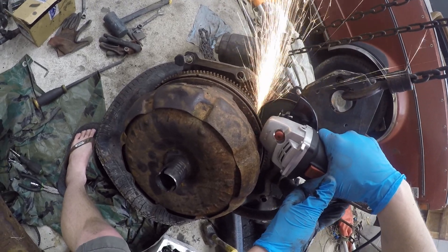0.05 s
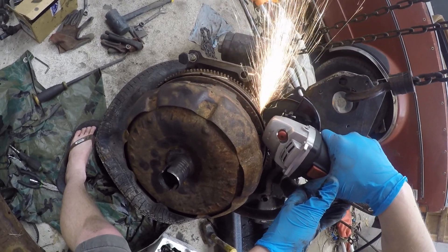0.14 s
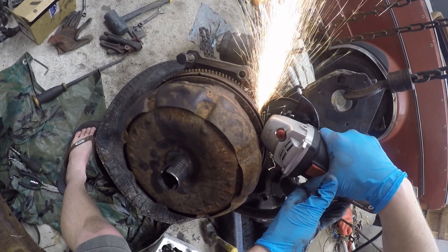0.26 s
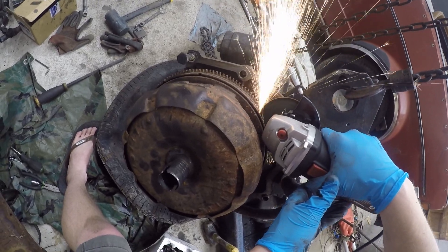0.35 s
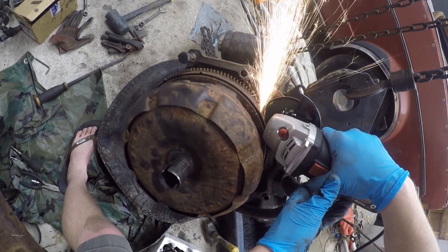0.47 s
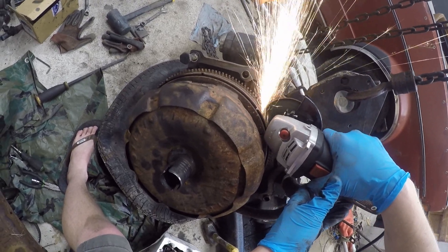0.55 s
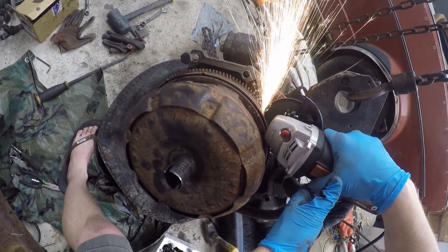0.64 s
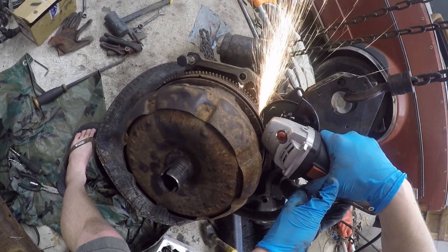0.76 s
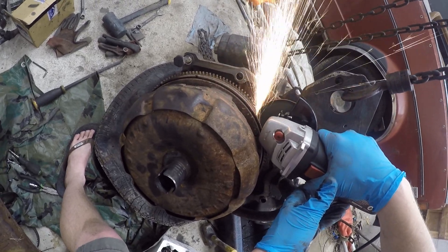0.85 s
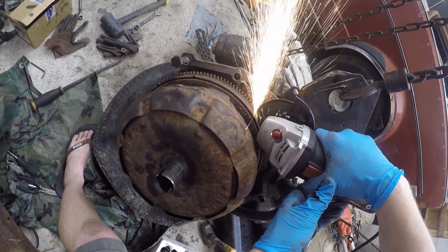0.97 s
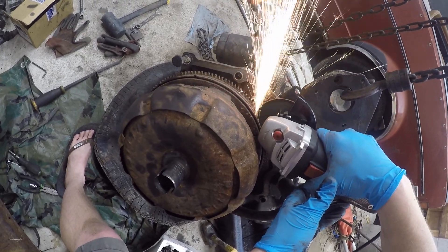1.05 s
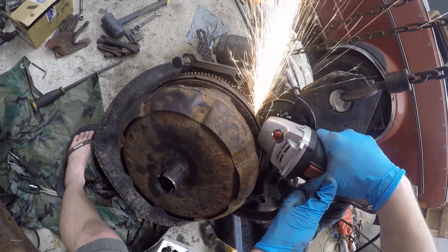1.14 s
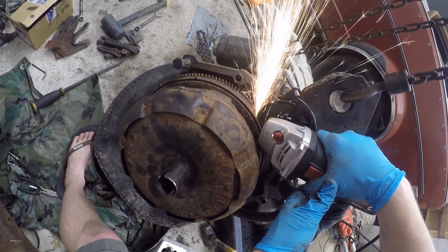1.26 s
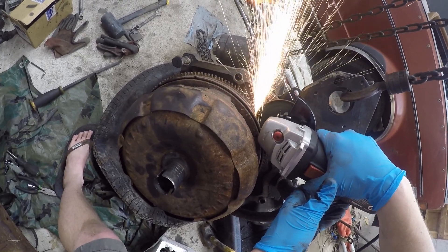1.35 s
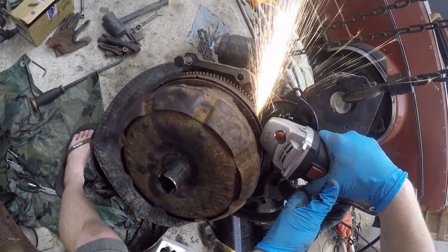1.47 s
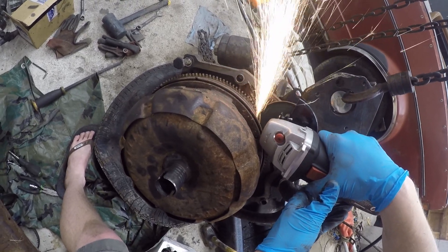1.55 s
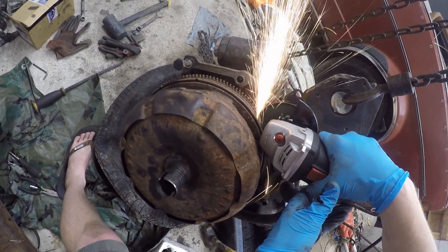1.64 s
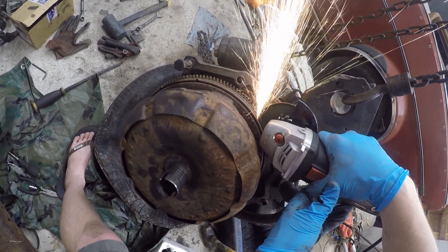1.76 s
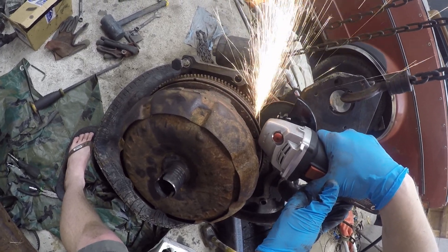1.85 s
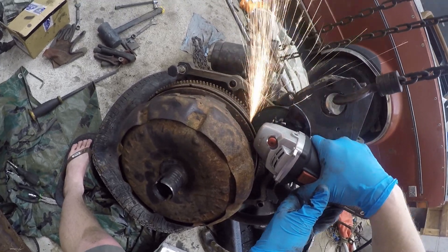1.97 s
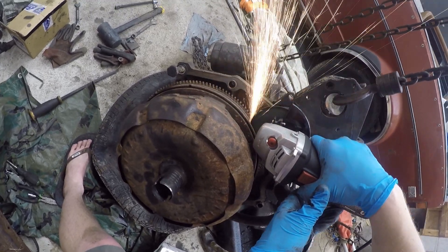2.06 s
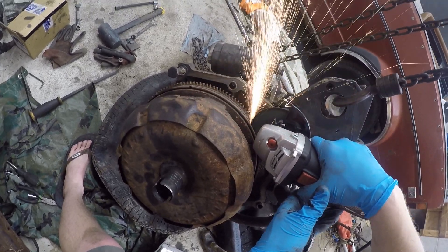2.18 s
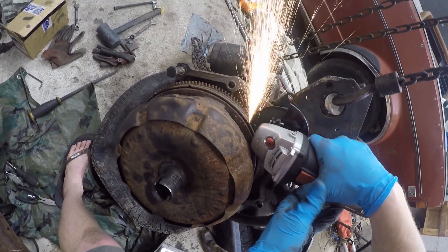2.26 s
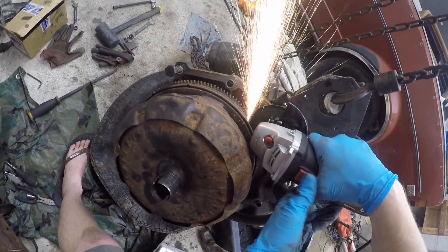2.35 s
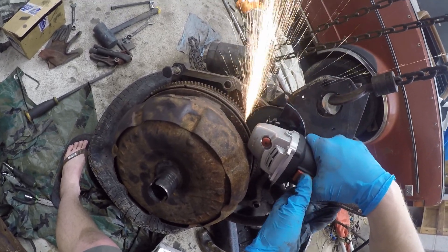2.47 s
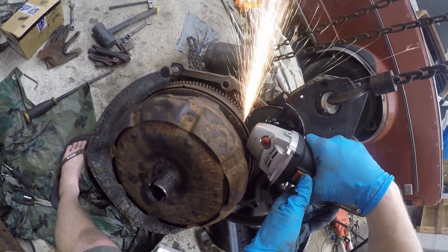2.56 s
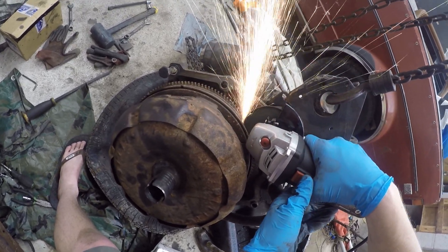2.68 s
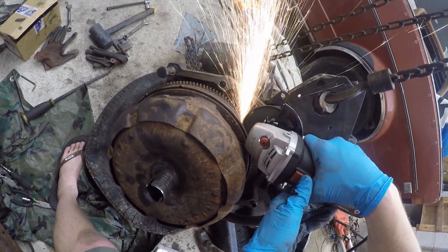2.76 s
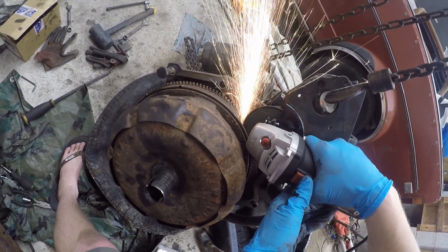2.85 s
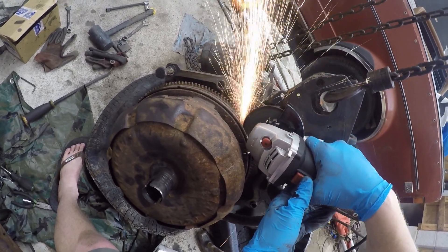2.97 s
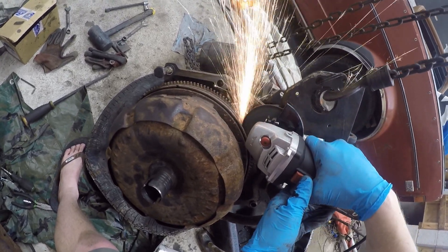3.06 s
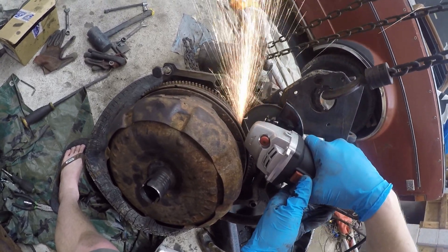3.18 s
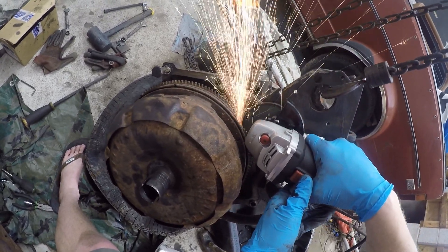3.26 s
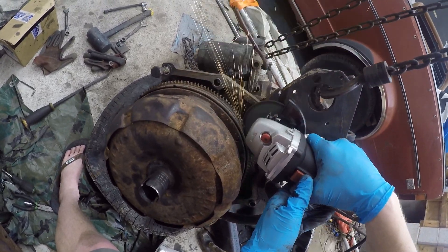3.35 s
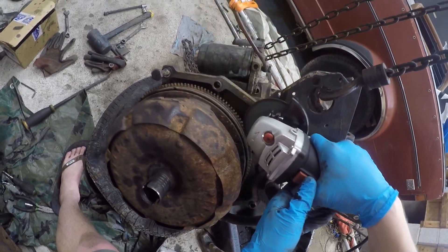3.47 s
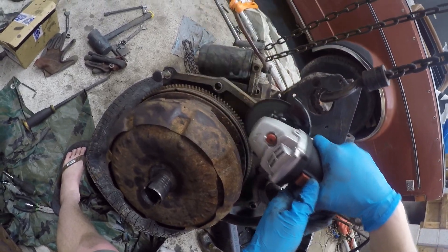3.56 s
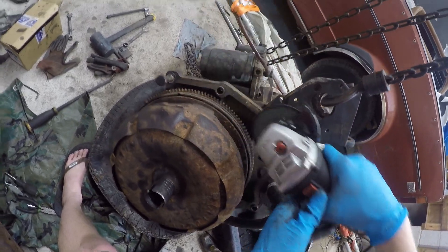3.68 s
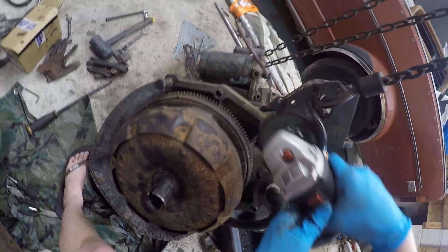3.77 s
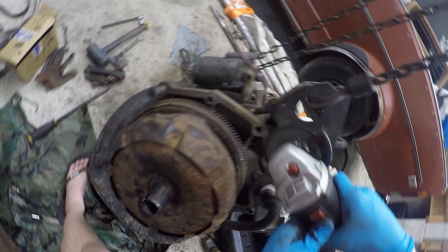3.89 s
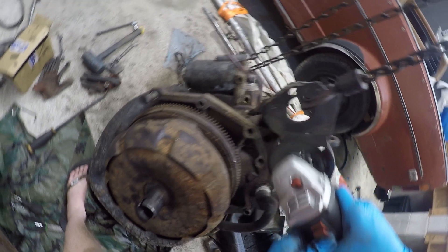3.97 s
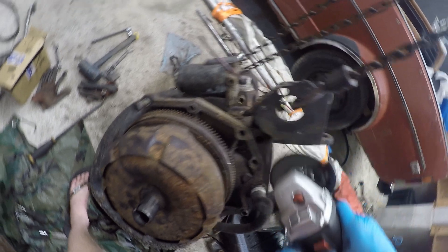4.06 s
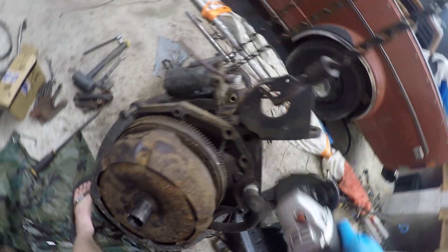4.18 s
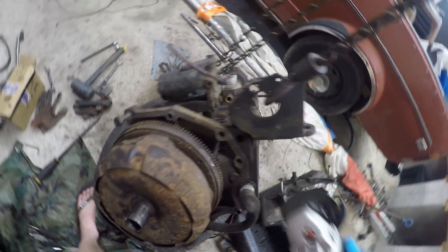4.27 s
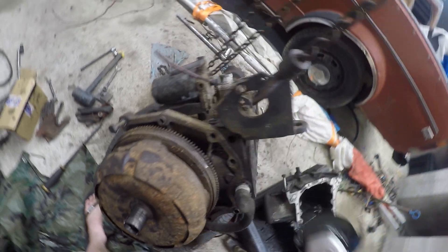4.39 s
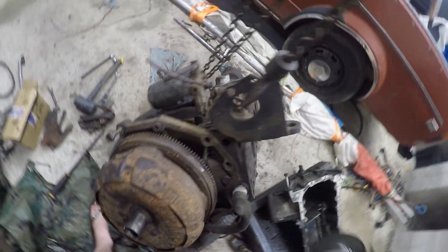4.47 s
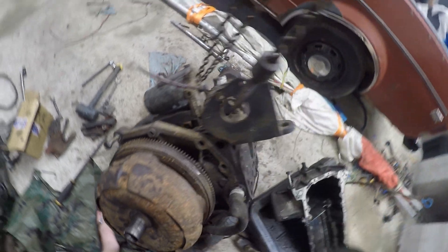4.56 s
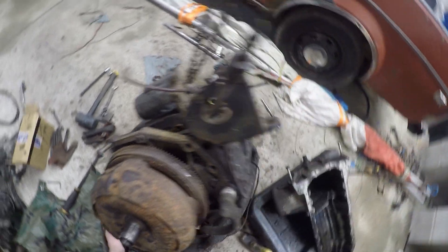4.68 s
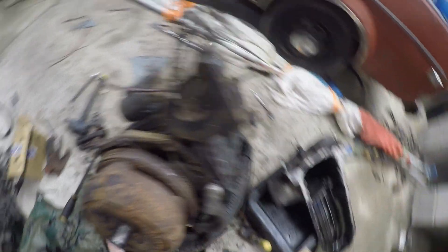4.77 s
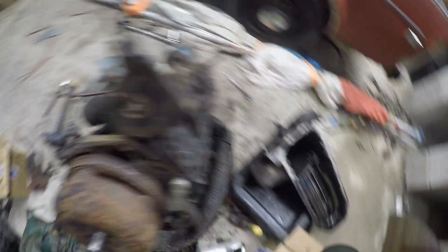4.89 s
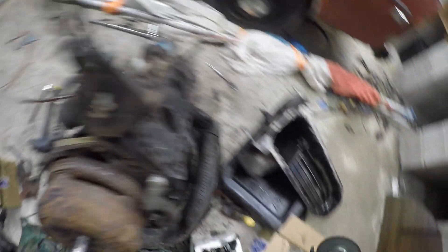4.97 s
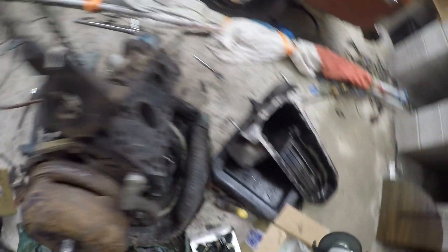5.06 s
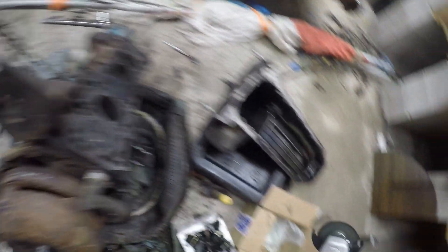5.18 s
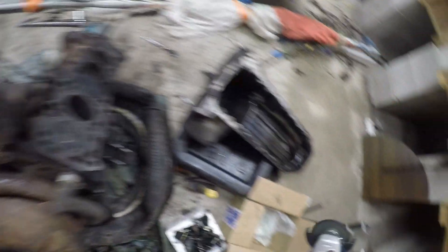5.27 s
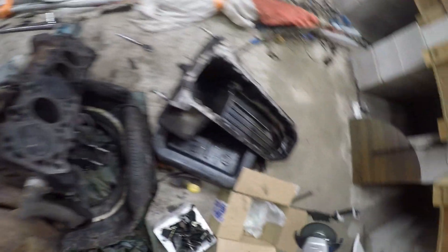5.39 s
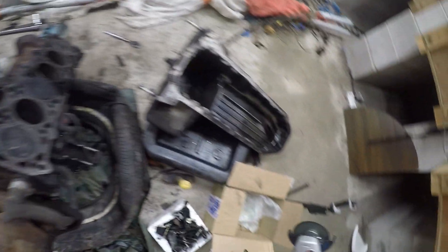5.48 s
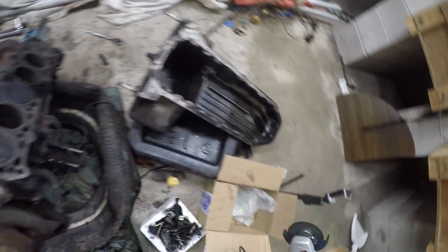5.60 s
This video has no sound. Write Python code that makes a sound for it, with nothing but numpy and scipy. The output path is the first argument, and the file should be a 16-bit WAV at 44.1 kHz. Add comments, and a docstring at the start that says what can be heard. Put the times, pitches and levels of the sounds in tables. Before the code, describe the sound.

Close by in a garage, an angle grinder labours through steel, rasping and ringing with an unsteady pitch. It speeds up into a sharper, squealing grind, then the cutting stops a little past halfway. The motor spins freely with a softer hissing whine and begins to coast down, with a few faint metal clicks. Light air and handling rumble touches the microphone underneath.

```python
"""Angle grinder cutting a bolt

An angle grinder cuts a steel bolt on an engine in a garage, heard in mono at arm's length.
The motor labours in the cut, picks up, is lifted clear, races and is switched off to coast down.
Grit and gear teeth force the steel into resonance, the disc's lobed rim chatters and squeals,
fan and brushes hiss and the unbalanced rotor hums, all following one shaft speed.
Air and handling rumble underneath, and a short metallic rattle comes near the end."""
import sys
import numpy as np
from scipy import signal
from scipy.fft import rfft, irfft, next_fast_len
from scipy.io import wavfile
from scipy.ndimage import uniform_filter1d

SR = 44100
rng = np.random.default_rng(int(sys.argv[2]) if len(sys.argv) > 2 else 0)


def wav_record(signal):
    """Record a signal, one row per channel, as 16-bit PCM in the file named by sys.argv[1]."""
    frames = np.transpose(np.atleast_2d(signal))
    bounded = np.clip(frames, -1, 1)
    # unit amplitude maps onto the largest positive 16-bit level
    quanta = np.round(bounded * 32767).astype(np.int16)
    wavfile.write(sys.argv[1], SR, quanta)


N = 248283
TIME = np.arange(N) / SR
FFT_SIZE = next_fast_len(N, real=True)
FREQ = np.maximum(np.arange(FFT_SIZE // 2 + 1) * SR / FFT_SIZE, 1)

# Motor speed under the hand's pressure. Each row: time in seconds, turns per second.
LOADED_SPEED = [(0, 232), (.1, 246), (.21, 348), (.45, 283), (.63, 254), (.78, 294), (.89, 269), (.97, 283),
                (1.05, 245), (1.17, 214), (1.35, 289), (1.52, 293), (1.72, 249), (1.96, 236), (2.03, 400),
                (2.32, 421.5), (2.39, 413), (2.55, 409), (2.73, 400.5), (2.91, 398), (3.3, 426.5)]
# Strength of the scraping. Each row: time in seconds, level in dB, treble share in dB.
CUT_LEVELS = [(0, -29.5, -13.5), (.75, -30.5, -10.5), (1.35, -29, -13.5), (2.0, -29.5, -13.5),
              (2.35, -28, -10), (2.8, -27.5, -12.5), (3.3, -27, -10)]
# Firmness of contact; the disc skims the bolt again on leaving. Each row: time in seconds, gain in dB.
DISC_CONTACT = [(0, 0), (3.315, -0.5), (3.34, -20), (3.36, -13), (3.385, -4), (3.41, -23), (3.45, -63)]
# Scraping that repeats with each turn of the disc. Each row: time in seconds, share in dB.
REPEATING_SHARE = [(0, -9), (1.95, -8), (2.1, -4.5), (2.4, -3), (2.7, -4), (3, -0.5), (3.3, -4)]
# The disc frees itself and bites cleanly. Each row: time in seconds, share of the fast colour, 0 to 1.
CLEAN_BITE = [(1.94, 0.2), (2.03, 0.27), (2.35, 0.58), (2.8, 0.83), (3.2, 0.9)]
# Broad colour of the cut. Each row: frequency in Hz, gain in dB when labouring, and when fast.
STEEL_COLOUR = [(150, -28, -34.5), (440, -24.5, -33), (780, -16, -11.5), (1580, -19.5, -8.5),
                (1830, -4, -9.5), (3570, -4, 4.5), (4350, -14.5, -7), (5570, -4, -4.5),
                (9040, -18.5, -17.5), (10900, -20.5, -16.5), (14900, -28.5, -8)]
# Modes of disc, guard and bolt. Each row: centre and width in Hz, lift in dB labouring, and fast.
STEEL_RESONANCES = [(902, 98, 20, 10.5), (1175, 118, 19.5, 9.5), (1618, 53, 8.5, 10.5),
                    (1806, 180, -1, 8.5), (2020, 244, 4.5, 14.5), (2250, 470, -0.8, 7.5),
                    (2448, 114, 7.5, -1), (2760, 130, 3, 6), (2937, 346, 12.5, 4.5), (3160, 130, 5.5, -7.5),
                    (3413, 125, 8.5, 2.5), (3769, 374, 16, 14), (4080, 600, 9, 4.5), (4513, 230, 8, 17.5),
                    (4846, 106, 9, 7), (5026, 386, 7.5, 19), (5313, 207, 2.5, 15), (5967, 400, 3.5, 13.5),
                    (6670, 130, 8.5, -1), (6640, 270, -7.5, 8), (7705, 760, 4.5, 17), (8130, 440, 1.5, 6.5),
                    (9400, 890, -4, 14.5), (10270, 330, -0.5, 14.5), (11750, 2500, -1, 13)]
# Lobes of the rim. Each row: bumps per turn of the disc, relative level in dB.
RIM_LOBES = [(7, -6), (13, -12), (14, -6), (15, -1), (16, -4), (17, -3), (18, -4), (19, -5), (21, -6),
             (35, -3), (37, -1), (38, 0), (41, -2)]
# Broad colour of the motor. Each row: frequency in Hz, gain in dB when near, and when far.
HOUSING_COLOUR = [(150, -25.5, -19), (514, -16.5, -20), (730, -11.5, -5), (1420, -3.5, -2.5),
                  (2280, -9.5, -6.5), (3750, 1.5, -2), (6060, -15, -9.5), (8680, -33, -22.5),
                  (12150, -19.5, -20), (15000, -18, -21)]
# Modes of housing and guard. Each row: centre and width in Hz, lift in dB when near, and when far.
HOUSING_RESONANCES = [(927, 300, 6, -4), (1130, 400, 10.5, 8.5), (1850, 240, 3, 5), (2025, 196, 9, 4),
                      (2460, 270, 8.5, 6), (2924, 380, 12, 7), (3456, 150, 9, 5.5), (3765, 250, 10, 5.5),
                      (4280, 340, 0.0, 8), (4700, 230, 10.5, 1), (5030, 460, 8, 10), (5730, 190, 5, 7.5),
                      (6056, 260, 11.5, 8), (6660, 400, 8.5, -3), (7150, 450, 5.5, 0.5),
                      (8140, 1140, 20.5, 10), (9540, 1300, 13.5, -1.5), (10670, 750, 4, 12),
                      (11450, 320, 9.5, 8), (13900, 1800, 1, -2)]
# The vents turn as the grinder is lifted. Each row: time in seconds, gain in dB, treble share in dB.
VENT_FACING = [(3.45, 3.5, -10.5), (3.85, 0.3, -7.5), (4.17, -0.1, -5), (4.42, -1.8, -6.5), (4.7, -1, -7.5),
               (5.63, -1.4, -9)]
# The grinder swings down and away. Each row: time in seconds, share of the far colour, 0 to 1.
SWING_AWAY = [(4.2, 0.2), (4.42, 0.93)]
# Overtones from disc shaft and rotor. Each row: multiple of the motor speed, relative level in dB.
HUM_OVERTONES = [(1.62, -1), (2, 1)]
# Low rumble, stronger while the motor labours. Each row: time in seconds, level in dB.
RUMBLE_LEVELS = [(0, -57.5), (1.85, -56.5), (2.1, -60.5), (5.63, -58)]
# Buffets of air and handling. Each row: time of the peak in seconds, level in dB.
AIR_BUFFETS = [(.05, -43), (.35, -47.5), (.53, -54), (1.08, -54), (1.63, -49.5), (2.51, -53), (3.48, -53.5),
               (4.08, -52), (4.94, -51), (5.26, -51)]
# Small metal knocks. Each row: start in seconds, level in dB, decay time in seconds.
METAL_KNOCKS = [(.045, -19, 0.0038), (0.338, -33.5, 0.0037), (1.256, -28, .005), (2.749, -25, 0.00081),
                (3.932, -37, 0.018), (4.016, -41, 0.0022), (4.062, -34.5, 0.021), (5.48, -45, 0.0048),
                (5.495, -47, 0.012)]
# Squeals. Each row: start and length in seconds, bumps per turn, level in dB at full contact.
DISC_SQUEALS = [(2.2, 0.069, 16, -32), (2.68, 0.267, 16, -29.5), (2.66, 0.13, 18, -33), (4, 0.11, 18, -41)]
# Brief dips in the noise. Each row: centre in seconds, depth in dB, half length in seconds.
LEVEL_DIPS = [(3.632, 5, .008), (4.592, 8, .008), (5.122, 8, .009), (5.336, 5, .007), (5.378, 5, .007)]

PINION_TEETH, GEAR_RATIO = 12, 12 / 37  # the ratio is disc turns per motor turn
WORKING_HZ = 400  # reference speed for the levels of chatter, fan and hum
DRAGGING = TIME < CLEAN_BITE[0][0]  # true until the disc frees itself


def undb(db):
    """Amplitude ratio for a level in decibels."""
    return np.exp(np.asarray(db) * (np.log(10) / 20))


def curves(table):
    """Linear interpolation in time of each column after the first."""
    times, *columns = np.transpose(table)
    return [np.interp(TIME, times, column) for column in columns]


def unit(x):
    """Normalisation to an rms of 1."""
    return x / np.sqrt(np.mean(x ** 2))


def steady(x, size=4001):
    """Normalisation by the running rms over size samples."""
    return x / np.sqrt(uniform_filter1d(x ** 2, size) + 1e-18)


def band(x, lo_hz, hi_hz, order=5):
    """Maximally flat band-pass filtering."""
    return signal.sosfilt(signal.butter(order, [lo_hz, hi_hz], "band", fs=SR, output="sos"), x)


def wander(hz, size=8192):
    """Random fluctuation of rms 1: noise low-passed at hz."""
    rates = np.arange(size // 2 + 1) * SR / N
    slow = irfft(rfft(rng.standard_normal(size)) / (1 + (rates / hz) ** 4))
    return np.interp(TIME, np.linspace(0, N / SR, size), unit(slow))


def octaves(hz):
    """Speed on a logarithmic scale, in octaves above the working speed."""
    return np.log2(hz / WORKING_HZ)


def resonance(hz, centre_hz, width_hz, lift_db):
    """Resonance curve: the lift in dB falls to half at half a width from the centre."""
    return lift_db / (1 + (2 * (hz - centre_hz) / width_hz) ** 2)


def radiation(hz, corner_hz):
    """Radiation efficiency: a small body radiates poorly below its corner frequency."""
    return np.minimum(hz / corner_hz, 1) ** 6


def ring(x, colour, modes=(), column=0):
    """Forced response of a body: a broad colour with resonances on it, from the chosen gain column."""
    colour_hz, *gains_db = np.transpose(colour)
    db = np.interp(np.log(FREQ), np.log(colour_hz), gains_db[column])
    for centre_hz, width_hz, *lifts_db in modes:
        db = db + resonance(FREQ, centre_hz, width_hz, lifts_db[column])
    # Folding the cepstrum gives minimum phase, so each mode rings after its cause.
    cepstrum = irfft(np.log(undb(db)), FFT_SIZE)
    cepstrum[1:FFT_SIZE // 2] *= 2
    cepstrum[FFT_SIZE // 2 + 1:] = 0
    return irfft(rfft(x, FFT_SIZE) * np.exp(rfft(cepstrum)), FFT_SIZE)[:N]


def shaft_speed(no_load_hz=552, run_up_s=.68, switch_off_s=4.01, coast_s=2.17):
    """Exponential relaxation: freed of its load the motor runs up; switched off, friction slows it."""
    freed_s, freed_hz = LOADED_SPEED[-1]
    powered_s = np.clip(TIME, freed_s, switch_off_s) - freed_s
    hz = curves(LOADED_SPEED)[0] + (no_load_hz - freed_hz) * (1 - np.exp(-powered_s / run_up_s))
    return hz * np.exp(-np.maximum(TIME - switch_off_s, 0) / coast_s)


def grains(per_second, spread_db):
    """Shot noise: dense, independent impacts of unequal size."""
    hits = rng.random(N) < per_second / SR
    sizes = rng.standard_normal(N) * undb(spread_db * np.minimum(rng.exponential(size=N), 4))
    return unit(hits * sizes)


def rim_roughness(disc_turns, size=2048, count=110):
    """Quasi-periodic excitation: the rim's roughness returns every turn and slowly changes with wear."""
    roughness = 0
    for _ in range(4):
        orders = np.zeros(size // 2 + 1, complex)
        orders[1:count] = np.exp(2j * np.pi * rng.random(count - 1))
        profile = np.interp(disc_turns % 1, np.arange(size) / size, irfft(orders))
        roughness += wander(2.32) * profile
    return steady(roughness)


def gear(turns, rattle_hz, clean):
    """Modulation of the tooth-mesh tone: backlash smears it and the crown wheel sways it once a turn."""
    sway = 0.11 * np.sin(2 * np.pi * GEAR_RATIO * turns)
    mesh = np.exp(1j * (2 * np.pi * PINION_TEETH * turns + sway))
    backlash = wander(rattle_hz) + 1j * wander(rattle_hz)
    return unit(np.real(mesh * (clean + backlash)))


def cutting(hz, turns):
    """Forced vibration: grit and loaded gear teeth drive the modes of the steel."""
    level_db, treble_db = curves(CUT_LEVELS)
    disc_turns = turns * GEAR_RATIO
    grit = grains(per_second=14000, spread_db=-1)
    grit += undb(curves(REPEATING_SHARE)[0]) * rim_roughness(disc_turns)
    pressure_db = 0.46 * np.sin(2 * np.pi * disc_turns) + 0.7 * wander(100)  # harder once a turn
    grit = steady(grit) * undb(pressure_db)
    flare_db = resonance(PINION_TEETH * hz, centre_hz=2920, width_hz=330, lift_db=3.8)
    loaded_whine = undb(-14.5 + flare_db + wander(4.9)) * gear(turns, rattle_hz=133, clean=0.99)
    fast_whine = undb(-20.5) * gear(turns, rattle_hz=190, clean=0.31)
    labouring = unit(ring(grit + loaded_whine, STEEL_COLOUR, STEEL_RESONANCES, column=0))
    fast = unit(ring(grit + fast_whine, STEEL_COLOUR, STEEL_RESONANCES, column=1))
    bite = curves(CLEAN_BITE)[0]
    steel = labouring * np.sqrt(1 - bite) + fast * np.sqrt(bite)
    body = steady(band(steel, 122, 6640), size=30001)
    treble = undb(treble_db) * steady(band(steel, 6230, 17500))
    return (body + treble) * undb(level_db - 0.86 + 0.45 * wander(11))


def chatter(hz, turns, level_db=-44.5, db_per_octave=30.5):
    """Periodic impact: the rim's lobes hammer the bolt; each tone swells on crossing a disc mode."""
    tones = 0
    for lobes, db in RIM_LOBES:
        order = lobes * GEAR_RATIO
        lift_db = resonance(order * hz, centre_hz=2070, width_hz=30, lift_db=4)
        phase = 2 * np.pi * (order * turns + rng.random())
        phase += .2 * (order / PINION_TEETH) ** 2 * wander(60)  # the finest lobes strike least evenly
        gain = undb(db + lift_db - 3.5 + 4 * wander(10))
        tones += radiation(order * hz, corner_hz=950) * gain * np.sin(phase)
    return tones * undb(level_db + db_per_octave * octaves(hz))


def motor(hz, turns, level_db=-43, db_per_octave=14.5):
    """Broadband excitation: brushes, fan and gear ring the housing, whose colour shifts as it swings."""
    facing_db, treble_db = curves(VENT_FACING)
    away = curves(SWING_AWAY)[0]
    brush_ticks = grains(per_second=9000, spread_db=0) * undb(1.6 * np.sin(2 * np.pi * turns))
    fan_air = 1.21 * rng.standard_normal(N)
    drive = brush_ticks + fan_air + undb(-23) * gear(turns, rattle_hz=150, clean=.4)
    near, far = (unit(ring(drive, HOUSING_COLOUR, HOUSING_RESONANCES, column=k)) for k in range(2))
    shell = near * (1 - away) + far * away
    rush = undb(-10.5) * steady(band(shell, 102, 1470))
    whirr = steady(band(shell, 1587, 6500))
    hiss = undb(treble_db + wander(25)) * steady(band(shell, 5950, 14800))
    gain_db = level_db + db_per_octave * octaves(hz) + facing_db + 0.31 * wander(18)
    return (rush + whirr + hiss) * undb(gain_db)


def rotor(hz, turns, level_db=-75.5, db_per_octave=8.5, drag_db=-5, whistle_order=37):
    """Rotating unbalance hums once a turn, damped by drag; a thin whistle follows the speed in pitch."""
    hum_db = level_db + db_per_octave * octaves(hz) + drag_db * DRAGGING + 2 * wander(3.8)
    angle = 2 * np.pi * turns
    lift_db = resonance(hz, centre_hz=342, width_hz=56, lift_db=7.9)
    hum = undb(lift_db) * np.sin(angle + 0.26 * wander(25))
    for order, db in HUM_OVERTONES:
        gain = radiation(order * hz, corner_hz=720) * undb(db + 2 * wander(8.8))
        hum += gain * np.sin(order * angle + 0.45 * wander(25))
    whistle_db = -79 + resonance(whistle_order * hz, centre_hz=11100, width_hz=1400, lift_db=16)
    flutter = .6 + wander(70) + 1j * wander(70)
    whistle = unit(np.real(np.exp(1j * whistle_order * angle) * flutter))
    return np.sqrt(2) * undb(hum_db) * hum + undb(whistle_db) * whistle


def rumble(buffet_s=0.078):
    """Low-frequency noise: air and handling shake and buffet the microphone over faint workshop noise."""
    # Each pair: frequency in Hz, gain in dB.
    shake_colour = [(6, -2.5), (20, 2.5), (32, -1.5), (50, 0), (65, -9.5), (85, -17), (150, -35),
                    (400, -50), (2000, -81)]
    workshop_colour = [(60, 2), (130, 0.5), (200, -10.5), (320, -6.5), (600, -2), (1000, -12),
                       (3000, -48)]
    shake = steady(ring(rng.standard_normal(N), shake_colour), size=9001)
    workshop = unit(ring(rng.standard_normal(N), workshop_colour))
    buffets = sum(undb(db) * np.exp(-((TIME - peak) / buffet_s) ** 2) for peak, db in AIR_BUFFETS)
    background = undb(curves(RUMBLE_LEVELS)[0] + 1.6 * wander(4.2))
    return shake * np.hypot(background, buffets) + undb(-76.5) * workshop


def garage(x, wet_db=-11.5, t60_s=0.17, count=40):
    """Early reflection: floor, engine and car body return a cluster of slightly dull echoes."""
    delays_s = rng.uniform(.003, .05, count)
    echoes = np.zeros(N)
    echoes[(delays_s * SR).astype(int)] = rng.standard_normal(count) * undb(-60 * delays_s / t60_s)
    wet = signal.fftconvolve(band(x, 200, 4100, order=1), echoes / np.linalg.norm(echoes))[:N]
    return (x + undb(wet_db) * wet) / np.hypot(1, undb(wet_db))


def knocks():
    """Impact excitation: short bursts of contact leave the steel parts ringing."""
    force = sum(undb(db) * (TIME >= start) * np.exp(-np.abs(TIME - start) / decay)
                for start, db, decay in METAL_KNOCKS)
    crunch = rng.standard_normal(N)
    steel_gain = np.std(ring(crunch, STEEL_COLOUR, STEEL_RESONANCES))
    return ring(force * crunch, STEEL_COLOUR, STEEL_RESONANCES) / steel_gain


def squeal(turns, attack_s=0.062, release_s=0.015):
    """Frequency locking: near its mode the disc sings in thin tones tied to its lobe counts."""
    disc_angle = 2 * np.pi * GEAR_RATIO * turns
    tones = 0
    for start, length, lobes, db in DISC_SQUEALS:
        age = np.maximum(TIME - start, 0)
        envelope = (1 - np.exp(-age / attack_s)) * np.exp(-np.maximum(age - length, 0) / release_s)
        gain = envelope * undb(db + .8 * wander(25))
        tones += gain * np.sin(lobes * disc_angle + 0.054 * wander(40))
    return tones


def dips():
    """Amplitude modulation: a gain that dips briefly along bell curves."""
    dip_db = sum(depth * np.exp(-((TIME - centre) / half) ** 2) for centre, depth, half in LEVEL_DIPS)
    return undb(-dip_db)


def scene():
    """Superposition: the grinder's noise and tones, driven by one shaft speed, add to the rumble."""
    hz = shaft_speed()
    waver = np.where(DRAGGING, .012, .00053)  # unevenness as a share of the speed
    turns = np.cumsum(hz * (1 + waver * wander(22))) / SR
    contact = undb(curves(DISC_CONTACT)[0])
    noise = garage(cutting(hz, turns) * contact + motor(hz, turns) + knocks())
    tones = (chatter(hz, turns) + squeal(turns)) * contact + rotor(hz, turns)
    mono = noise * dips() + tones + rumble()
    return np.array([mono, mono])


def record(dry):
    """Band limiting: a steep low-pass filter removes the treble above 15.4 kHz."""
    return signal.sosfilt(signal.ellip(12, .2, 80, 15400, fs=SR, output="sos"), dry)


dry = scene()
out = record(dry)
wav_record(out)
```